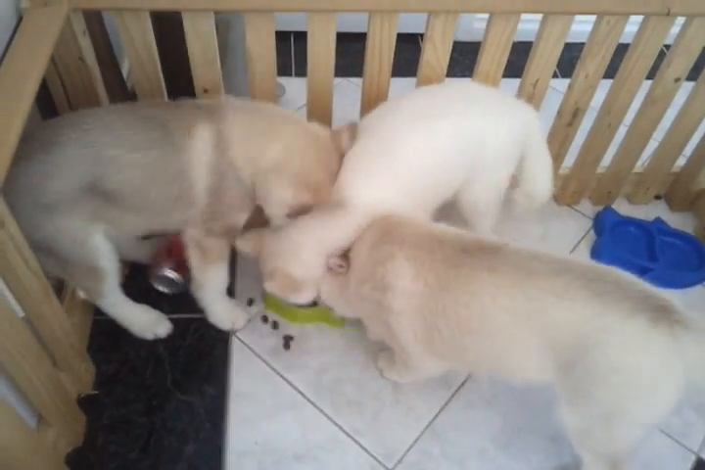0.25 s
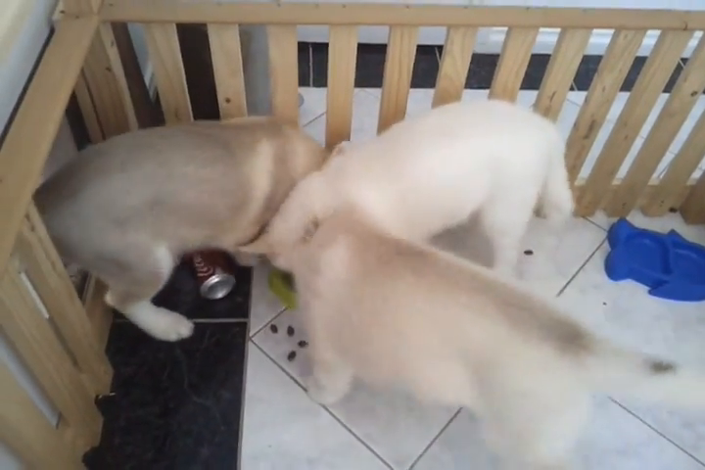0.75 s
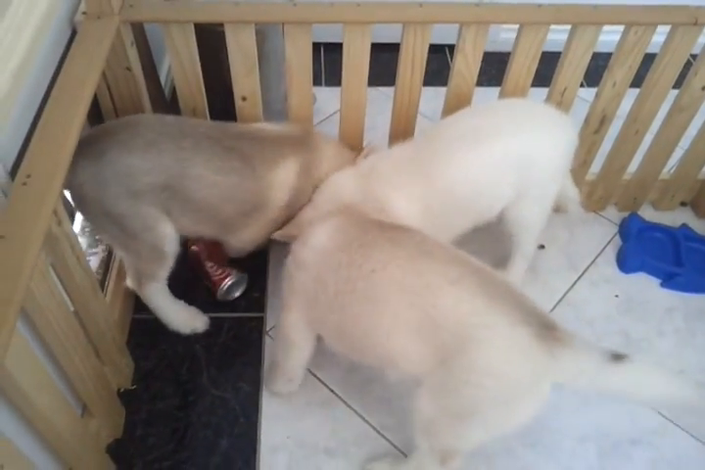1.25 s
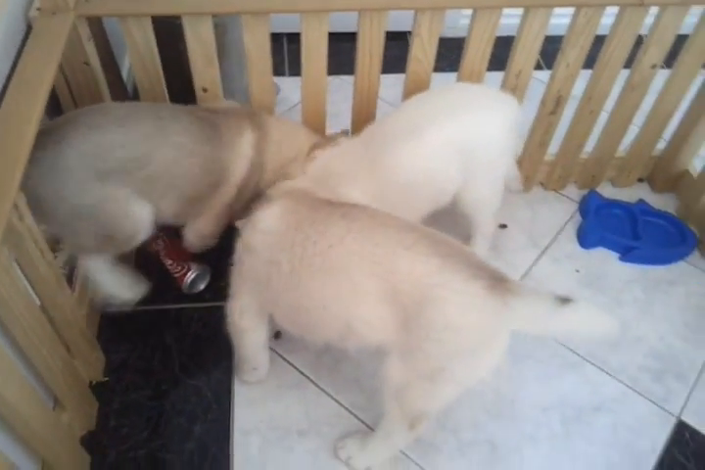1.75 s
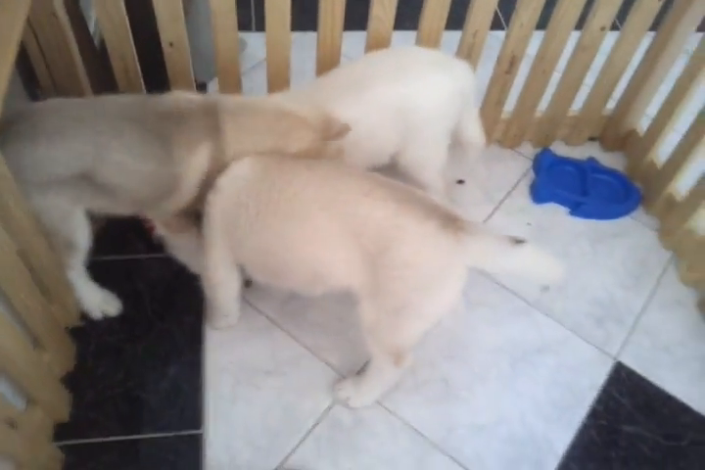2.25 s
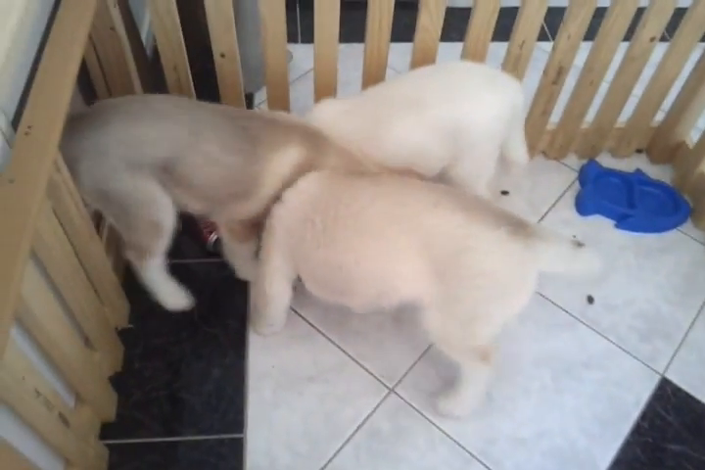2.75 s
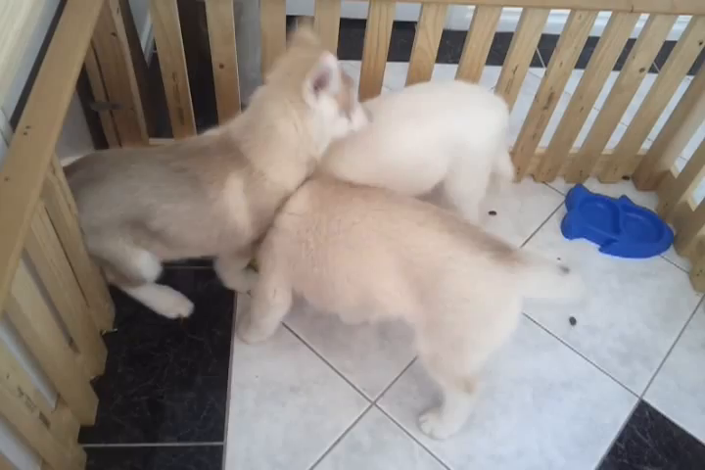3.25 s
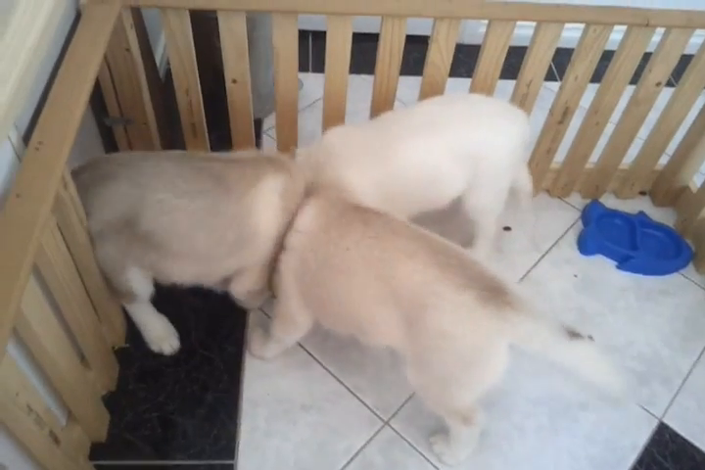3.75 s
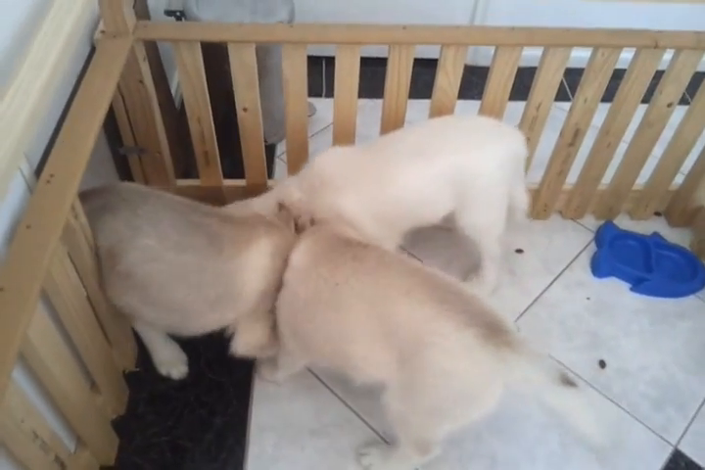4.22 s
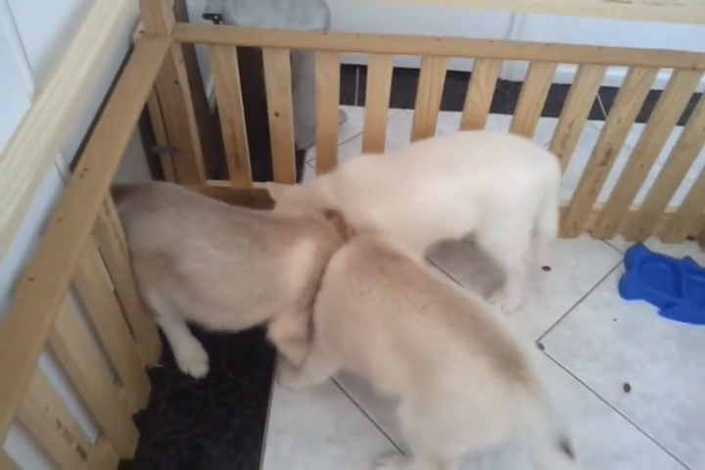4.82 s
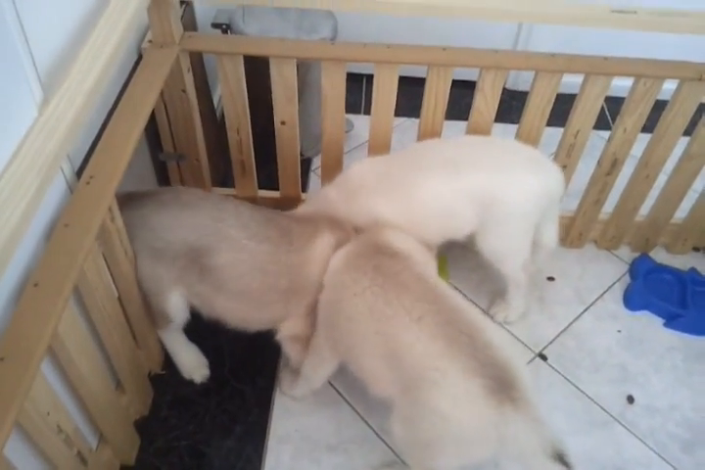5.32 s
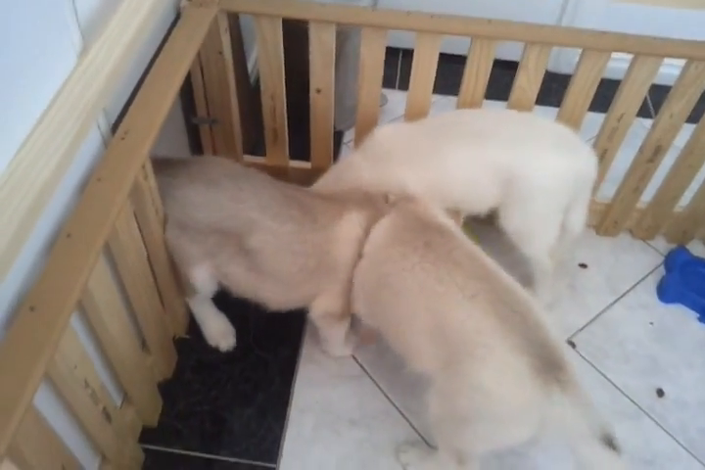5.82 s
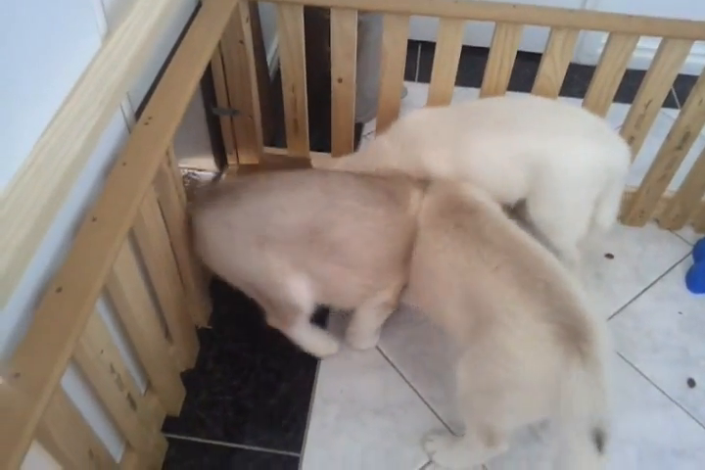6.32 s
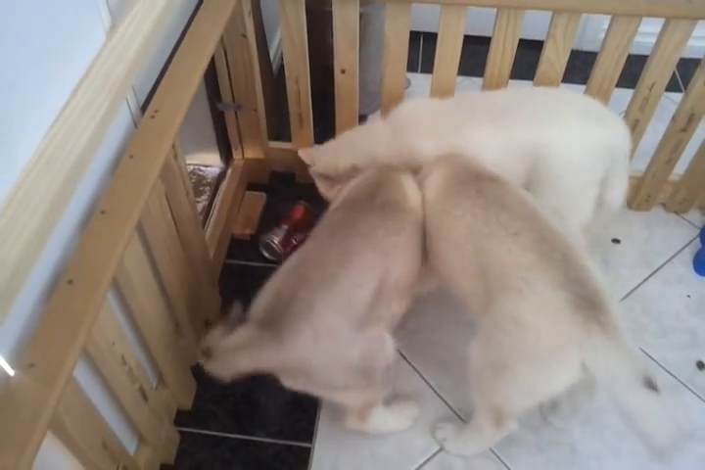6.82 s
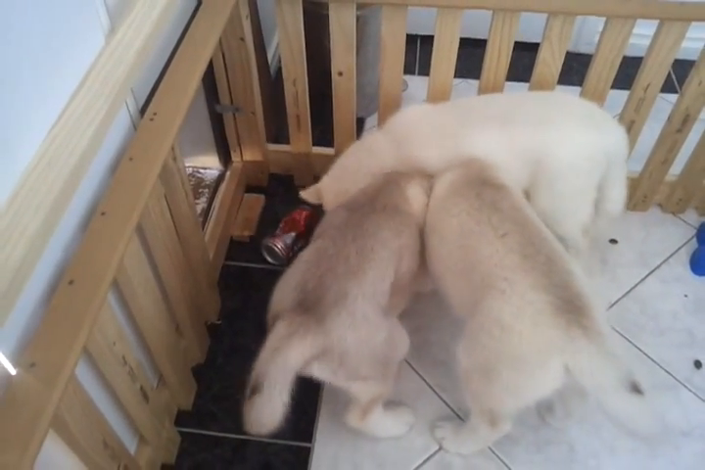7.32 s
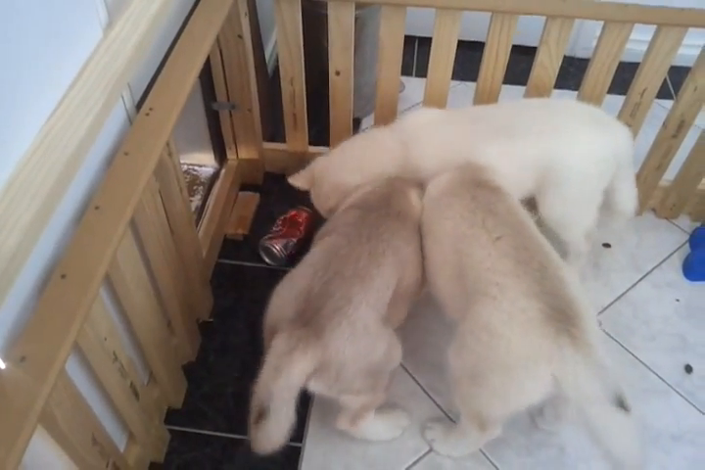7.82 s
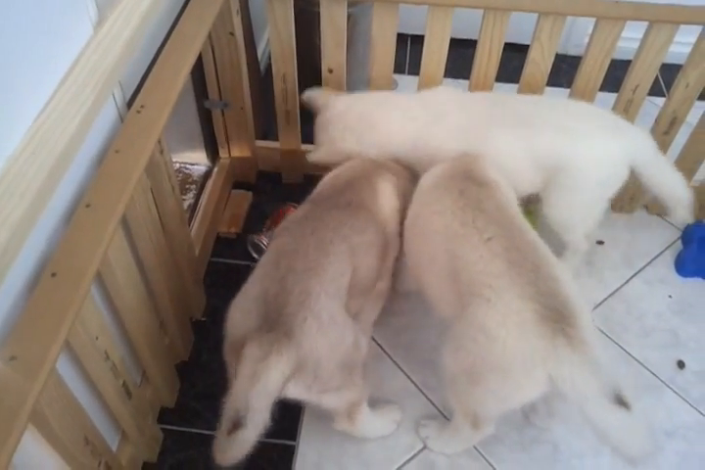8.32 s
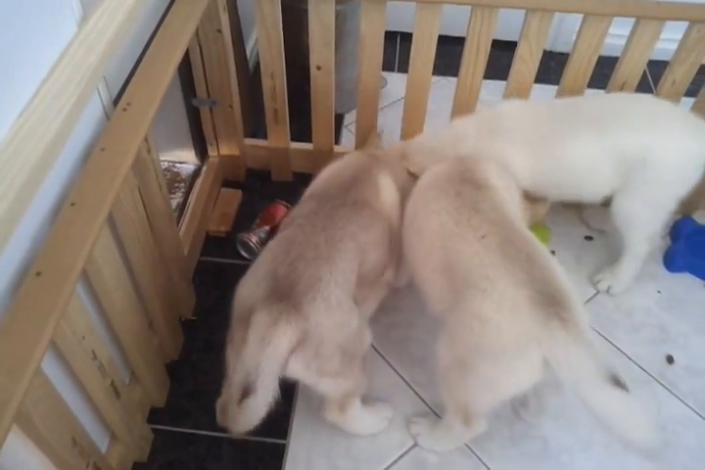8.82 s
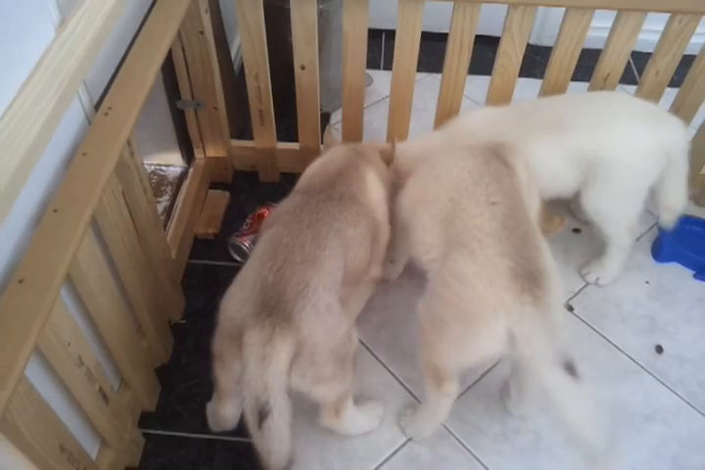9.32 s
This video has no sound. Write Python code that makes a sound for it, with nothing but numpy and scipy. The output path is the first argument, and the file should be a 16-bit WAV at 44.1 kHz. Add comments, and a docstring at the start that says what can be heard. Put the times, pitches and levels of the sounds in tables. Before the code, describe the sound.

Hollow plastic bowl clatters and scrapes on hard tiles as hungry puppies chew dry kibble, claws clicking and paws thudding in a reverberant room.

```python
"""Three puppies jostle over kibble in a wooden pen that stands in a hard, echoing tiled room.
Over a faint, steady rush they chew and shuffle, eagerly at first: filtered showers of tiny random impacts.
At once their plastic bowl knocks on floor and slats, as ringing noise bursts with edge clicks and floor booms.
Soon claws and kibble click, the bowl scrapes along in trains of tiny blows, and paws thud as low booms.
All this goes on in turns; the chewing and shuffling have a lull near the end."""
import sys
import numpy as np
from scipy import signal
from scipy.fft import rfft, irfft, next_fast_len
from scipy.io import wavfile
from scipy.ndimage import map_coordinates

SR = 44100
rng = np.random.default_rng(int(sys.argv[2]) if len(sys.argv) > 2 else 0)


def waveform_to_disk(signal):
    """Save audio, clipped to [-1, 1], as 16-bit WAV at the path in sys.argv[1]."""
    frames = np.transpose(np.atleast_2d(signal))
    scaled = np.clip(frames, -1, 1) * 32767
    samples = np.round(scaled).astype(np.int16)
    wavfile.write(sys.argv[1], SR, samples)


N = 421596  # length in samples, about 9.6 s
TOP_HZ = 8200  # nothing is kept above this


def amp(db):
    """Turn decibels into a gain."""
    return 10 ** (np.asarray(db) / 20)


def unit(x):
    """Scale to an average (rms) level of 1."""
    return x / np.sqrt(np.mean(x ** 2) + 1e-20)


def add(track, s, sound):
    """Mix a sound into a track at time s in seconds."""
    start = max(round(s * SR), 0)
    track[start:start + len(sound)] += sound[:N - start]


def filtered(x, response):
    """Weight each frequency of x by the gain that response(hz) gives."""
    m = next_fast_len(len(x) + 4096)
    return irfft(rfft(x, m) * response(np.fft.rfftfreq(m, 1 / SR)), m)[:len(x)]


def along(points, hz):
    """Gain of a spectrum of (Hz, dB) points, joined by straight lines on a log frequency axis."""
    point_hz, point_db = np.transpose(points)
    return amp(np.interp(np.log(hz + 1), np.log(point_hz), point_db))


def coloured(x, points):
    """Give x the colour of a spectrum, at rms 1."""
    return unit(filtered(x, lambda hz: along(points, hz)))


def below(hz, edge_hz, order=10):
    """Gain of a low-pass: higher orders cut more steeply."""
    return 1 / np.sqrt(1 + (hz / edge_hz) ** (2 * order))


def resonance(hz, centre_hz, q):
    """Power gain of one resonance, about 1 at its centre and narrower for a larger q."""
    return 1 / (1 + (q * (hz / centre_hz - centre_hz / (hz + 1))) ** 2)


def grains(count, rate, spread_db):
    """Tiny impacts at random moments, rate a second on average, some larger than the rest."""
    size = amp(spread_db * np.minimum(rng.exponential(size=count), 3))
    happens = rng.random(count) < rate / SR
    return happens * rng.choice([-1, 1], count) * size


def room(x, t60):
    """The tiled room's echo: a noise tail that falls 60 dB in t60 seconds, with about the energy of x."""
    t = np.arange(SR) / SR
    tail = rng.standard_normal(SR) * amp(-60 * t / t60)
    return signal.fftconvolve(x, tail / np.linalg.norm(tail))[:N]


# Colour of the still room. Each row: frequency in Hz, relative level in dB per Hz.
HUSH_COLOUR = [(15, -43), (25, -9.5), (109, -2.5), (190, -10), (242, -5), (339, -10), (2640, -20),
               (3200, -17.5), (6130, -18), (8000, -29), (10400, -73), (17600, -120)]


def hush():
    """The faint rush of the still room is steady noise with its own colour."""
    return amp(-51) * coloured(rng.standard_normal(N), HUSH_COLOUR)


# Chewing and shuffling, eager at first and with a lull near the end.
# Each row: time in seconds, level of the rubbing in dB, level of the crunching in dB.
BUSTLE_LEVELS = [(0, -29, -26.5), (.7, -43, -42.5), (1.3, -39, -43.5), (2.3, -42.5, -46.5),
                 (3.0, -40, -41.5), (4.1, -47, -47), (5.3, -35.5, -42), (5.8, -44.5, -46.5),
                 (7.25, -41, -42.5), (7.75, -52.5, -53), (8.6, -54, -58.5), (9.099, -45.5, -51.5),
                 (9.56, -44, -54.5)]


def bustle():
    """Muzzles and paws rub about while teeth crush kibble: both are many tiny impacts, blurred by the room."""
    s, rub_db, crunch_db = np.transpose(BUSTLE_LEVELS)
    t = np.arange(N) / SR
    # both colours: frequency in Hz, relative level in dB per Hz
    rub_colour = [(60, -21.5), (250, -15.5), (400, -5.0), (560, 0.0), (850, -4.5),
                  (1500, -7), (2300, -23.5), (8000, -40)]
    crunch_colour = [(300, -24.5), (1300, 2.5), (2200, 0.5), (4000, -2), (6700, -4.5), (8000, -14.5)]
    rubbing = coloured(grains(N, rate=400, spread_db=5.0), rub_colour)
    crunching = coloured(grains(N, rate=140, spread_db=5.5), crunch_colour)
    # a little direct sound, and much by way of the room
    rubbing = unit(0.13 * rubbing + room(rubbing, t60=0.65))
    crunching = unit(0.35 * crunching + room(crunching, t60=0.63))
    return amp(np.interp(t, s, rub_db)) * rubbing + amp(np.interp(t, s, crunch_db)) * crunching


# The most that the clack changes in dB, the spot in Hz that changes nothing, and the growth per octave
CLACK_DB, MIDDLE_SPOT_HZ, STIFFENING = 7, 743, 1.5


def clack(spot_hz):
    """Clack over the body in dB: the stiffer the spot, the higher it rings and the more it clacks."""
    return CLACK_DB * np.tanh(STIFFENING * np.log2(spot_hz / MIDDLE_SPOT_HZ))


LIFT_DB = -22  # a clack louder than this lifts the bowl, and it bounces twice
FLIGHT_S, FLIGHT_SHRINK = .032, .75  # first flight in seconds, and the second as a share of it
BOUNCE_LOSS_DB = 6  # each bounce is softer by this
BOUNCE_BRIGHTENING = 1.3  # a lighter bounce is a shorter contact: its crack is higher by this factor

# The bowl or the pen is knocked. Each row: start in seconds, level of the body in dB,
# resonance of the struck spot in Hz, crack over the body in dB, crack frequency in Hz.
KNOCKS = [(.002, -18.5, 510, -10.5, 3180), (.257, -34, 800, 9, 4550), (.276, -15, 602, -6, 3760),
          (.512, -29, 820, -4.5, 3560), (.594, -31.5, 710, -0.5, 3940), (0.794, -29, 560, -9.5, 2500),
          (1.056, -37, 924, -4.5, 3450), (1.065, -31, 990, 0, 2590), (1.274, -30.5, 1120, -4, 2920),
          (1.346, -25.5, 1610, 3, 2400), (1.657, -36, 1170, 4, 3200), (1.72, -28, 402, -13, 4530),
          (2.484, -38.5, 480, 6, 5500), (2.501, -28.5, 940, 4, 6740), (2.853, -38.5, 1700, 9, 4470),
          (2.966, -27.5, 690, -4, 3060), (3.074, -44.5, 1210, 5, 6470), (3.371, -40, 560, -15, 3480),
          (3.431, -33, 720, -2.5, 3470), (3.511, -18.5, 780, -7, 2830), (3.565, -24, 970, -4, 4300),
          (3.669, -21, 965, -5, 4670), (3.986, -39, 800, -0.5, 2320), (4.125, -31, 600, -10.5, 3250),
          (4.459, -40, 1520, 7.5, 3130), (4.531, -25, 715, -11.5, 2960), (5.001, -31.5, 527, -3, 6200),
          (5.23, -32, 503, -3, 5450), (5.403, -28.5, 540, -7, 6560), (5.892, -32, 400, -5.5, 6600),
          (6.187, -38.5, 686, -8, 4840), (6.782, -17.5, 1172, -7.5, 2920), (6.879, -20.5, 610, -9, 4500),
          (7.049, -22.5, 769.5, -9.5, 3080), (7.162, -25, 665, -19, 2980), (7.374, -35, 540, 0.5, 5330),
          (7.484, -31.5, 840, -0.5, 2770), (7.906, -43, 484, -12.5, 4270), (8.032, -42, 920, -4.5, 2630),
          (8.7, -26.5, 1430, -3.5, 3070), (9.316, -26.5, 655, -10.5, 4270)]


def contacts():
    """List every knock, and the ever shorter and brighter bounces of the bowl after the hard ones."""
    for s, db, spot_hz, crack_db, crack_hz in KNOCKS:
        clack_db = clack(spot_hz)
        delays = [0]
        if db + clack_db > LIFT_DB:
            delays = [0, FLIGHT_S, FLIGHT_S * (1 + FLIGHT_SHRINK)]
        for bounce, delay in enumerate(delays):
            bright_hz = min(crack_hz * BOUNCE_BRIGHTENING ** bounce, TOP_HZ)
            yield s + delay, db - bounce * BOUNCE_LOSS_DB, clack_db, crack_db, spot_hz, bright_hz


# What bowl and pen ring with, before each blow shifts it a little.
# Each row: frequency in Hz, level in dB against the diffuse sound.
RING_MODES = [(220, -21.5), (283, -19.5), (361, -13), (428, -24), (482, -18.5), (533, -17.5), (608, -12),
              (683, -15), (771, -11.5), (931, -12.5), (1003, -21.5), (1109, -16), (1270, -18),
              (1480, -15.5), (1552, -27), (1654, -26), (1934, -22.5), (2373, -20.5), (2835, -31.5),
              (3160, -25.5), (4000, -27.5)]
# Colour of a blow in the room. Each row: frequency in Hz, relative level in dB per Hz.
BLOW_COLOUR = [(40, -19), (120, -16.5), (220, -6.5), (320, -3.5), (450, -0.5), (580, 2.5), (760, 0),
               (1050, -3), (1550, -5), (2000, -10), (3500, -13), (5000, -15.5), (6800, -12.5),
               (8000, -25.5)]
# How long the room rings: time in seconds to fall 60 dB, for body, clack and crack in that order.
ROOM_T60 = [0.74, 0.68, 0.63]


def blow(clack_db, crack_db, wall_hz, crack_hz, early_db, ring_db, wall_db):
    """One contact as the room returns it: dense first reflections, ringing modes and a long tail."""
    count = 2 ** 15
    t, hz = np.arange(count) / SR, np.fft.rfftfreq(count, 1 / SR)
    spectrum = rfft(rng.standard_normal(count)) * along(BLOW_COLOUR, hz)
    spectrum /= np.linalg.norm(spectrum)

    # each contact favours other modes, and leaning bodies detune them a little
    mode_hz, mode_db = np.transpose(RING_MODES)
    size, detune, phase = rng.standard_normal((len(RING_MODES), 3)).T
    mode_bins = np.searchsorted(hz, mode_hz * (1 + .004 * detune))
    spectrum[mode_bins] += amp(mode_db + ring_db + 5.2 * size) * np.exp(2j * np.pi * phase)

    # the spot that is hit adds one resonance of the wall and one of the hard edge
    wall = amp(wall_db) ** 2 * resonance(hz, wall_hz, q=15.6)
    edge = resonance(hz, crack_hz, q=3.8)
    spectrum *= np.sqrt(1 + wall + edge)

    # a stiff spot radiates little bass, and the contact time dulls what lies above the crack
    bass_edge_hz = .5 * min(wall_hz, 800)
    spectrum *= np.hypot(.25, hz ** 2 / np.hypot(hz ** 2, bass_edge_hz ** 2))
    spectrum *= np.hypot(.65, below(hz, 1.66 * crack_hz))

    # crowded upper modes ripple the colour anew each time
    ripple = map_coordinates(rng.standard_normal(400), [hz / 90], mode="mirror")
    spectrum *= amp(2.4 * ripple)

    # split into body, clack and crack, each with its own level and tail
    low, high = below(hz, 800, order=6), below(hz, 1900, order=7)
    bands = irfft(spectrum * np.array([low, high - low, 1 - high]))
    early = amp(early_db - 60 * t / 0.11)
    sound = np.zeros(count)
    for band, db, t60 in zip(bands, (0, clack_db, crack_db), ROOM_T60):
        sound += amp(db) * unit(band) * np.hypot(early, amp(-60 * t / t60))
    rise_s = min(0.00061 * amp(-crack_db), .005)  # duller contacts build up more slowly
    return (1 - np.exp(-t / rise_s)) * sound


def knocks():
    """Single contacts strike and ring; loose kibble rattles for a moment, so the level flutters."""
    out = np.zeros(N)
    for s, db, *colour in contacts():
        sound = blow(*colour, early_db=0, ring_db=-1.5, wall_db=6.5)
        t = np.arange(len(sound)) / SR
        rattle = map_coordinates(rng.standard_normal(200), [t * 170], mode="mirror")
        add(out, s, amp(db + 1.63 * rattle * np.exp(-t / 0.12)) * sound)
    return out


EDGE_DB, EDGE_SOFTENING = 15.5, 1.3  # edge click over the crack in dB; dB lost per dB of missing clack
CLAW_ROOM_DB, EDGE_ROOM_DB = -2.5, -0.5  # the bowl, hidden by the puppies, is heard more by way of the room

# Claws and loose kibble click on the tiles.
# Each row: start in seconds, approximate peak in dB before the room's echo, ring frequency in Hz.
CLAW_CLICKS = [(0.114, -16, 3980), (2.047, -24, 3050), (2.3448, -12.5, 2300), (2.387, -19.5, 2370),
               (2.779, -17.5, 2770), (3.276, -21.5, 3520), (3.407, -24.5, 5000), (4.334, -20, 3020),
               (5.595, -21, 4000), (7.94, -32.5, 4440), (9.521, -29.5, 3500)]


def ticks():
    """List the clicks of the bowl's edge at each knock, then of claws and kibble, with their room level."""
    edges = []
    for s, db, spot_hz, crack_db, crack_hz in KNOCKS:
        softening_db = EDGE_SOFTENING * min(clack(spot_hz), 0)
        edges.append((s, db + crack_db + EDGE_DB + softening_db, crack_hz, EDGE_ROOM_DB))
    return edges + [(*click, CLAW_ROOM_DB) for click in CLAW_CLICKS]


# Colour of a click. Each row: frequency in Hz, relative level in dB per Hz.
CLICK_COLOUR = [(200, -27.5), (1100, -8.5), (1700, 3.5), (3300, -0.5), (5000, -1.5), (8000, -14)]


def clicks():
    """Small hard contacts ring for a few milliseconds, heard directly and by way of the room."""
    direct, sent = np.zeros(N), np.zeros(N)
    t = np.arange(SR // 20) / SR
    for s, db, ring_hz, room_db in ticks():
        noise = rng.standard_normal(len(t))
        ring = filtered(noise, lambda hz: along(CLICK_COLOUR, hz)
                        * np.sqrt(0.093 + resonance(hz, ring_hz, q=1.6)))
        # noise peaks lie roughly 10 dB over its rms
        click = amp(db - 10 - 60 * t / 0.031) * unit(ring)
        add(direct, s, click)
        add(sent, s, amp(room_db) * click)
    return direct + room(sent, t60=.6)


WEIGHT_DB, WEIGHT_HZ = -24, 200  # the floor booms under every knock: level against its body, and pitch

# Paws and bodies thud. Each row: start in seconds, level in dB before it dies away, boom frequency in Hz.
THUDS = [(.602, -40, 129), (1.101, -39, 190), (1.408, -29.5, 143), (1.498, -40, 131), (1.8, -32, 160),
         (2.05, -40.5, 143), (2.692, -44, 190), (3.3, -40, 168), (4.05, -44, 150), (4.318, -39, 172),
         (4.54, -37.5, 150), (6.048, -43, 129), (6.679, -37, 170), (7.056, -37, 92), (8.033, -41.5, 164.5),
         (8.706, -34.5, 82), (8.89, -41.5, 132), (9.378, -40, 232)]


def thuds():
    """Soft weight on the floor booms in the room's low modes: low noise that swells fast and dies away."""
    out, t = np.zeros(N), np.arange(SR // 2) / SR
    under_knocks = [(s, db + WEIGHT_DB, WEIGHT_HZ) for s, db, *_ in KNOCKS]
    for s, db, boom_hz in [*THUDS, *under_knocks]:
        noise = rng.standard_normal(len(t))
        boom = filtered(noise, lambda hz: np.sqrt(resonance(hz, boom_hz, q=1.0)) * below(hz, 2 * boom_hz))
        swell = 1 - np.exp(-t / 0.0024)
        add(out, s, amp(db - 60 * t / 0.51) * swell * unit(boom))
    return out


# Sliding clacks less than a knock (dB), and depends less on the spot (a share); grit hisses at this Hz
SCRAPE_CLACK_DB, SCRAPE_STIFFNESS, GRIT_HZ = -2, 0.56, 5300

# The bowl is shoved along. Each row: start in seconds, length in seconds, level of the body in dB,
# resonance of the rubbing spot in Hz, crack over the body in dB.
SCRAPES = [(0.291, 0.1, -17, 578, -15), (0.443, 0.042, -28, 437, -7.5), (0.598, .066, -29.5, 460, -12.5),
           (0.872, .088, -33.5, 380, -6.5), (1.126, 0.048, -32.5, 335, -6.5), (1.409, .1, -22.5, 372, -19),
           (1.788, .09, -26, 474, -8.5), (2.122, .06, -32, 583, -3.5), (2.666, .092, -36.5, 530, -10.5),
           (3.448, 0.044, -27.5, 780, -13), (3.759, 0.081, -28.5, 980, -8.5), (4.01, .1, -31, 694, -8.5),
           (4.258, 0.057, -34, 523, -7.5), (4.473, 0.065, -35.5, 1510, -1.5), (4.57, .14, -30, 634, -7.5),
           (5.039, .09, -23.5, 425, -3.5), (5.149, .18, -26.5, 600, -10), (5.409, .082, -25, 520, -11.5),
           (6.014, 0.053, -36, 1180, -5), (6.414, .11, -22.5, 462, -10.5), (6.55, .025, -31.5, 475, -7.5),
           (7.063, 0.054, -28.5, 700, -15.5), (8.045, .045, -47, 1810, -5),
           (8.712, 0.026, -26.5, 717, -6.5), (8.85, .08, -24, 698, -11), (9.353, 0.065, -37, 350, -11)]


def scrapes():
    """The sliding bowl sticks and slips: a swell of tiny blows."""
    out = np.zeros(N)
    for s, length, db, spot_hz, crack_db in SCRAPES:
        clack_db = SCRAPE_CLACK_DB + SCRAPE_STIFFNESS * clack(spot_hz)
        sound = blow(clack_db, crack_db, spot_hz, GRIT_HZ, early_db=6, ring_db=-11.5, wall_db=7.0)
        count = int(length * SR)
        swell = np.sqrt(np.abs(np.sin(np.pi * np.arange(count) / count)))
        slips = grains(count, rate=900, spread_db=4) * swell
        slips /= np.linalg.norm(slips) + 1e-9
        add(out, s, amp(db) * signal.fftconvolve(slips, sound))
    return out


def scene():
    """Everything over the faint rush of the room, in one channel."""
    mix = hush() + bustle() + knocks() + clicks() + thuds() + scrapes()
    return mix[None]


def record(dry):
    """Round off the highest peaks, dull the top treble and keep nothing from TOP_HZ up."""
    rounded = dry / (1 + (dry / .9) ** 8) ** (1 / 8)
    return np.array([filtered(x, lambda hz: below(hz, 7300) * (hz < TOP_HZ)) for x in rounded])


dry = scene()
out = record(dry)
waveform_to_disk(out)
```